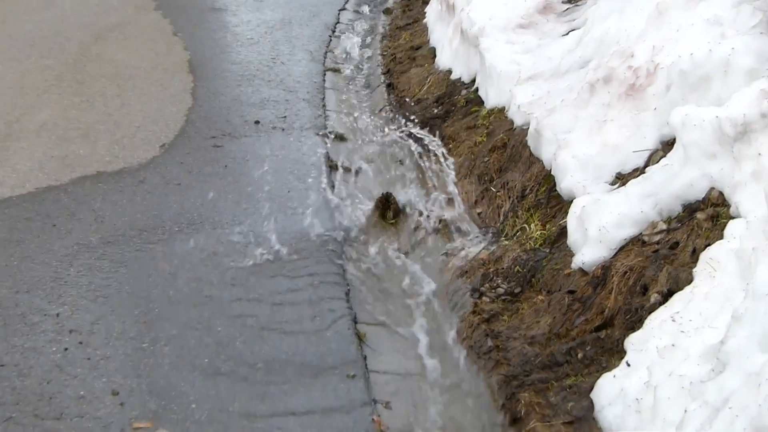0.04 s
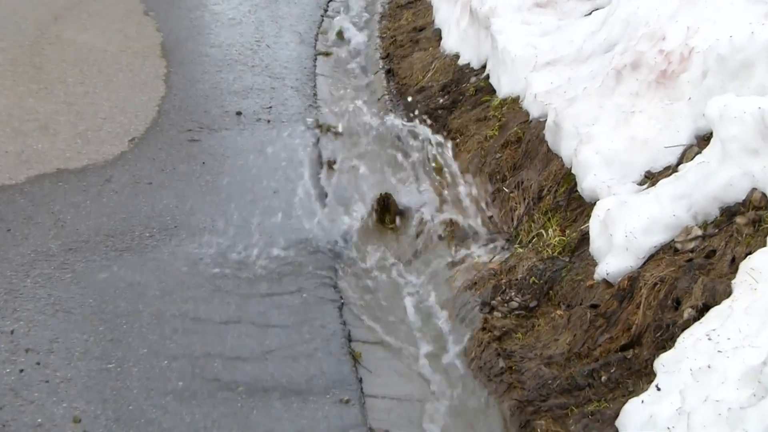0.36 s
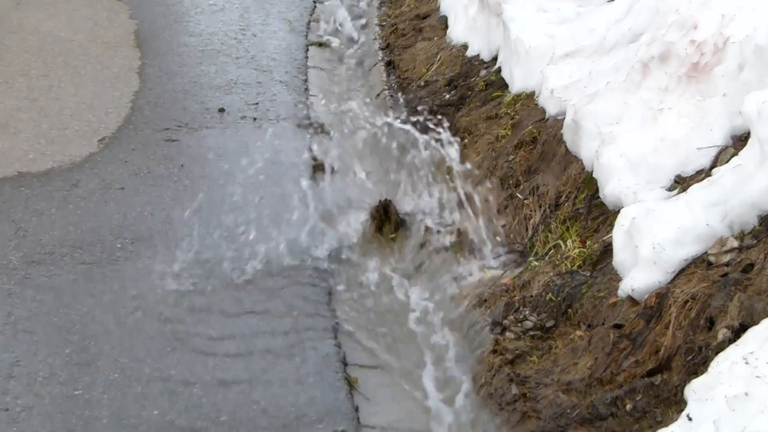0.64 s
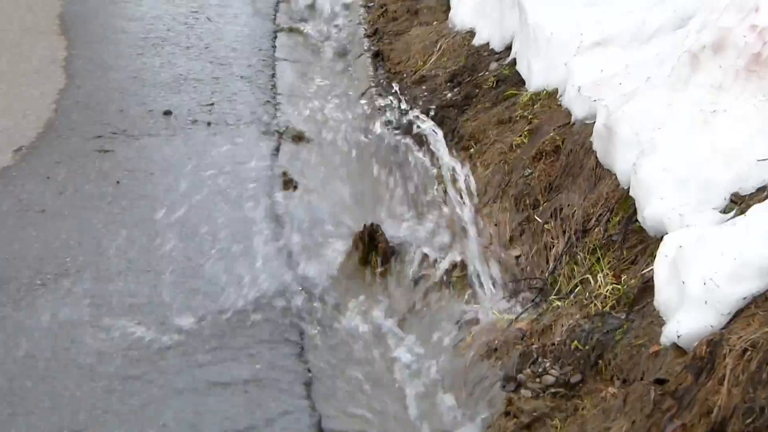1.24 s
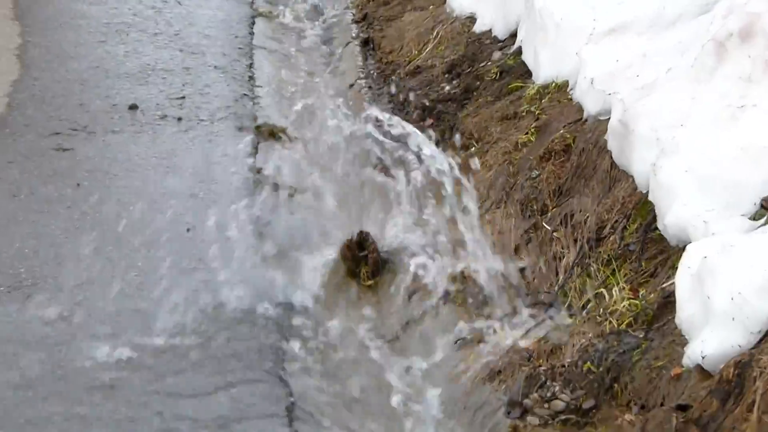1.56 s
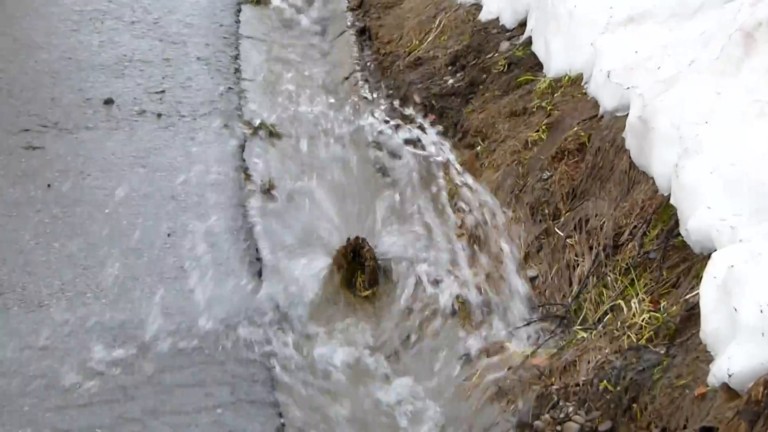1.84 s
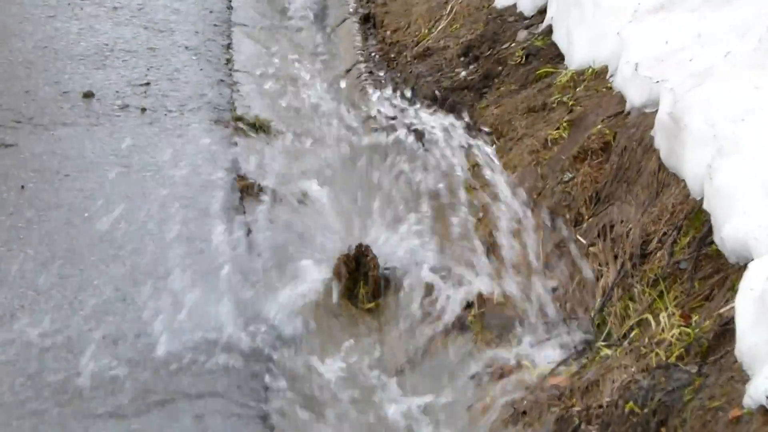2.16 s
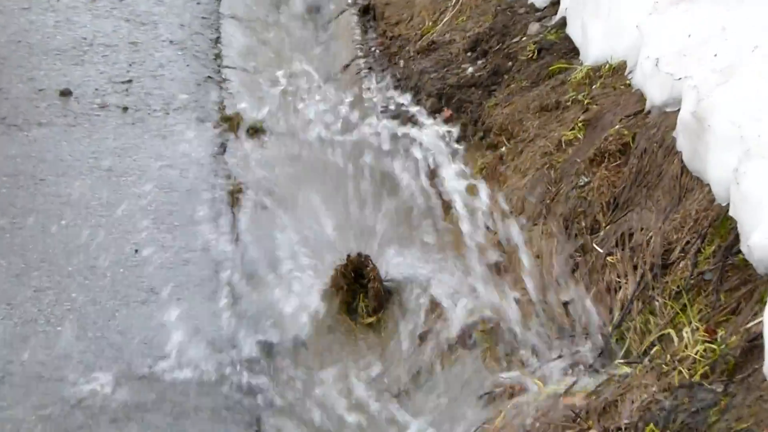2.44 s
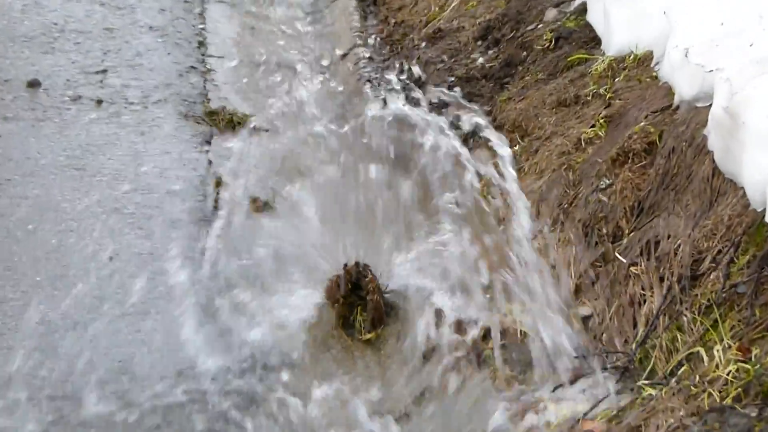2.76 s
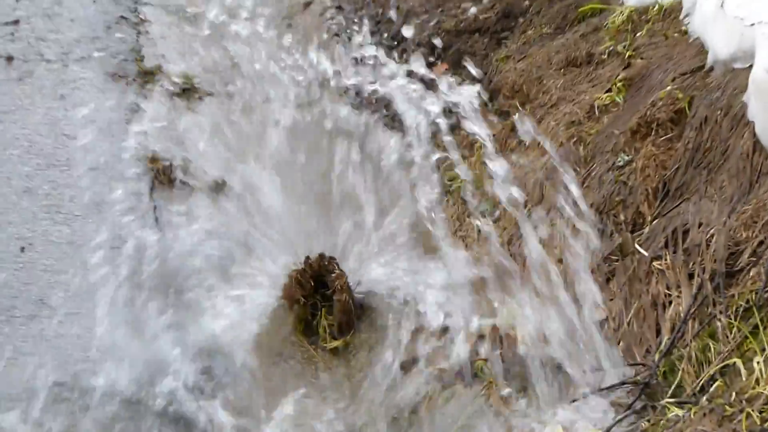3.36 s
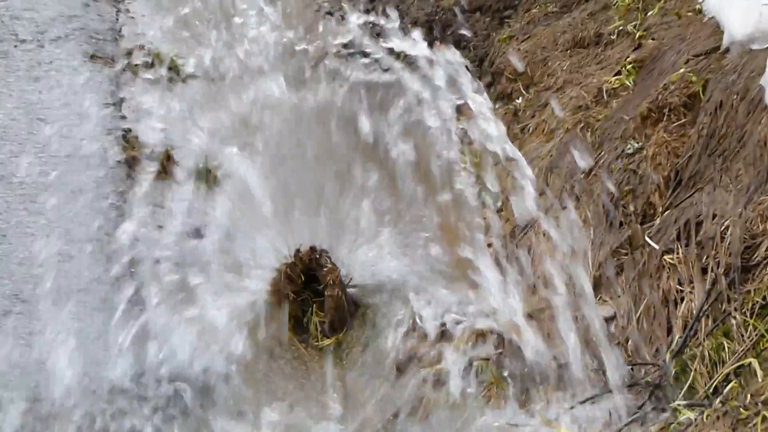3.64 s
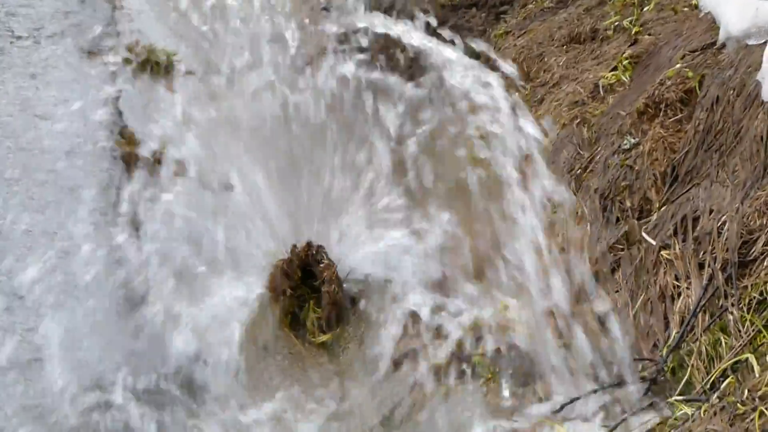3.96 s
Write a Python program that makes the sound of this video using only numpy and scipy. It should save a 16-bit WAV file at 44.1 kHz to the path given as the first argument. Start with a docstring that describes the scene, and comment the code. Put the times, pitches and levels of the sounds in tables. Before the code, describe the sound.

Fast meltwater rushes steadily along a roadside gutter, heard from close by outdoors. It bubbles and gurgles throughout as it fans over an obstacle, with spattering spray, scattered small splashes and ticking drops.

```python
"""Meltwater racing down a roadside gutter and fanning out over an obstacle, heard from close by
through two closely spaced microphone ports. Countless far bubbles blur into a steady rush; nearer
ones ring as small pings, gurgles and single glugs, under a spatter of falling spray. Small splashes
break out here and there, near drops tick on the water, and one lands right beside the right-hand port.
A faint rumble lies underneath."""
import sys
import numpy as np
from scipy import signal
from scipy.fft import rfft, irfft, next_fast_len
from scipy.io import wavfile
from scipy.ndimage import uniform_filter1d, map_coordinates

SR = 44100
rng = np.random.default_rng(int(sys.argv[2]) if len(sys.argv) > 2 else 0)


def file_out(sig):
    """Save sig as 16-bit WAV at sys.argv[1]."""
    # one column per channel
    cols = np.atleast_2d(sig).T
    # limit, then scale
    lim = np.clip(cols, -1, 1)
    pcm = np.round(lim * 32767).astype(np.int16)
    wavfile.write(sys.argv[1], SR, pcm)


N = 176400

# colour shared by the rush and the swarms of bubbles and spray: (frequency [Hz], level [dB])
WATER_COLOUR = [(25, -24.5), (70, -36.5), (130, -24), (185, -22), (225, -19.5), (280, -17.5), (330, -17),
                (400, -14.5), (530, -6.5), (720, -3), (940, -5.5), (1080, 1.7), (1240, 2.5), (1400, -1.9),
                (1720, 0), (1970, -9.5), (2250, -4), (2800, -4.5), (3400, -6), (4200, -6), (5300, -13),
                (6600, -10), (8500, -14), (10800, -17), (12500, -22.5), (14000, -27.5), (15700, -28.5)]
# the rush's own colour on top of that: (frequency [Hz], level [dB])
RUSH_COLOUR = [(30, 1.5), (150, -4.5), (400, -4.5), (1200, -5.5), (3000, -1), (7000, -2.5), (15000, -1.5)]
# how alike the rush is on left and right: (frequency [Hz], correlation [0-1])
RUSH_LIKENESS = [(40, 0.3), (150, .05), (260, 0.27), (380, 0.11), (560, 0.91), (1300, .91), (2600, 0.87),
                 (4000, 0.83), (5500, 0.63), (10500, 0.88), (13500, 0.22), (15500, 0.4)]
# swells of the bubbling mids: (time [s], level [dB])
CHURN_SWELLS = [(0.0, -1), (0.47, 1.4), (0.6, -5.5), (0.75, 0), (0.79, 2.8), (0.9, 2.2), (0.95, -1),
                (1.26, 3), (1.32, -1), (1.4, -1), (1.54, 1.5), (1.62, -2.1), (1.87, 1.5), (1.96, -3),
                (2.07, 2.5), (2.22, -5), (2.35, 1.1), (2.56, -1), (2.75, 2), (2.86, -5), (2.92, 3),
                (3.13, -2), (3.25, 2), (3.33, -1.2), (3.6, -0.7), (3.85, 3), (3.99, -9)]
# swells of the splashing treble: (time [s], level [dB])
SPRAY_SWELLS = [(0.0, -0.7), (0.18, 0.5), (0.49, 0.35), (0.96, 1.3), (1.03, -0.1), (1.48, 0.5), (1.51, -1),
                (1.59, 1), (2.0, 0), (2.32, 0.4), (2.43, 0), (2.66, 1), (2.87, 0.1), (3.42, -0.2),
                (3.77, 0.4), (3.84, 0), (3.92, 3.5), (3.99, 2)]
# swells of the low gurgle: (time [s], level [dB])
GURGLE_SWELLS = [(0, 4), (.08, 0), (.3, -3), (.78, -7), (.89, 3.5), (1.05, -2), (1.41, 2.5), (1.66, -2),
                 (1.92, -1), (2.02, 6), (2.2, 0.5), (2.87, -5), (3.02, 4), (3.33, -3), (3.54, 3.5),
                 (3.9, -1.5), (4, 1)]
# big single bubbles: (time [s], relative level [dB], starting pitch [Hz])
BIG_BUBBLES = [(.057, -23.5, 745), (.287, -19.5, 700), (.79, -15.5, 1060), (.842, -19, 700),
               (.877, -20, 846), (.88, -19, 1150), (1.052, -25.5, 700), (1.308, -20, 700),
               (1.325, -25, 774), (1.329, -13, 1510), (1.388, -24.5, 550), (1.41, -34, 472),
               (1.541, -14, 1080), (1.799, -14, 1205), (1.881, -14.5, 1190), (1.963, -26, 710),
               (2.735, -18, 1090), (2.921, -15, 1096), (3.053, -14, 1430), (3.213, -22.5, 544),
               (3.252, -18, 866), (3.455, -16, 1220), (3.469, -17, 1230), (3.713, -25, 700),
               (3.785, -17, 833), (3.843, -17.5, 1220)]
# lumps of water breaking up: (time [s], relative peak [dB], centre pitch [Hz])
SMALL_SPLASHES = [(.1, -24, 3600), (.14, -24, 3400), (.148, -21.5, 2700), (.181, -21, 3650),
                  (.244, -25.5, 3500), (.277, -20, 3350), (.307, -25, 3100), (.372, -27, 2900),
                  (.562, -24, 2700), (.66, -24, 3700), (.69, -25, 3920), (0.907, -26, 3100),
                  (1.461, -22, 2700), (1.598, -28, 2700), (1.682, -24, 3400), (1.758, -24, 4000),
                  (2.335, -24, 3600), (2.638, -21.5, 3200), (2.661, -23.5, 3620), (3.375, -27, 2900),
                  (3.543, -21.5, 3000), (3.645, -25.5, 3000), (3.903, -23, 3600), (3.969, -24, 4200)]
# drops near the microphone: (time [s], level [dB], starting pitch [Hz], ring length [cycles])
NEAR_DROPS = [(.14, -15, 6840, 8.4), (.224, -18.5, 7500, 11), (.579, -20, 7000, 12), (.652, -27, 4350, 94),
              (0.85, -17, 6500, 16), (1.296, -10.5, 7240, 10.4), (1.395, -19, 8500, 10),
              (1.766, -20, 6500, 11), (2.0297, -14.5, 3780, 10.3), (2.325, -27, 4300, 70),
              (2.757, -14, 8000, 7.8), (3.102, -23, 2500, 28), (3.527, -23, 3000, 18),
              (3.538, -18.5, 5000, 8.9), (3.921, -15, 3660, 13)]
# modes of the microphone casing: (frequency [Hz], relative level [dB], time to fall 60 dB [s])
CASING_MODES = [(1200, -8, .011), (1620, -8, .010), (2500, -4, .005), (3150, -6.5, .005), (3950, -4, .005),
                (4950, -9, .004), (7000, -5.5, .004), (9000, -6, .004), (10700, -7, .004),
                (12000, -7, .004)]
# colour of the snap beside the port: (frequency [Hz], level [dB])
CRACK_COLOUR = [(500, -6), (1200, 0), (4500, -1), (5700, -10), (7000, -3), (11500, -4), (13500, -12)]
# swells of the background rumble: (time [s], level [dB])
RUMBLE_SWELLS = [(0, -72), (.14, -73), (.3, -91), (1.8, -83), (2.35, -66.5), (2.9, -83), (3.41, -77),
                 (3.45, -59), (3.5, -76), (4, -77)]
# how the two ports differ: (frequency [Hz], left minus right [dB], left lead [rad])
PORT_SHADING = [(100, -1, 0), (260, 2, 0), (380, .8, -.6), (550, 1.8, .1), (780, 1.2, 0), (930, -.7, .2),
                (1150, 2.7, .35), (1400, .7, .3), (1700, 2, .3), (1980, .1, .3), (2300, 1, .2),
                (2800, -1.5, .4), (3400, .5, .6), (4500, -3.2, 1.2), (5300, 1.8, 2), (5800, 5, 1.4),
                (7500, 1.7, 1.3), (8700, -3.6, 1.8), (10300, -.7, 2.8), (12200, 3.2, 3), (15700, .6, 3.2)]

RUSH_DB, BUBBLE_DB, GURGLE_DB, PLINK_DB, SPRAY_DB = -38, -42.5, -56.5, -46, -44.5  # before the swells
HOLLOW_HZ, HOLLOW_WIDTH_HZ, HOLLOW_SWAY = 1200, 280, 0.21  # the bubbles' weight sways about this centre
TOP_HZ = 15900


def stream():
    """Churning drives the bubbles and sways their size; spray lands in spurts and leaves rising plinks."""
    churn_db, gurgle_db = curve(CHURN_SWELLS), curve(GURGLE_SWELLS)
    spurt_db = curve(SPRAY_SWELLS) + wobble(per_s=60) + 0.23 * wobble(per_s=25.38)
    bed = rush(patchy_db=1.5)
    bubbles = swarm(per_s=1300, low_hz=700, high_hz=2022, cycles=18.5, rise=0.078,
                    onset_cycles=0.71, spread_db=2.5, width_s=9e-5)
    tilted = filtered(bubbles, lambda hz: np.tanh((hz - HOLLOW_HZ) / HOLLOW_WIDTH_HZ))
    bubbles = unit(bubbles + HOLLOW_SWAY * wobble(per_s=12) * tilted)
    gurgles = swarm(per_s=220, low_hz=219, high_hz=568, cycles=26.7, rise=0.17,
                    onset_cycles=0.76, spread_db=2.5, width_s=5.9e-4)
    plinks = swarm(per_s=520, low_hz=1811, high_hz=8000, cycles=63, rise=0.097,
                   onset_cycles=0.92, spread_db=2.0, width_s=3.5e-5)
    spray = swarm(per_s=1800, low_hz=2590, high_hz=13800, cycles=10, rise=0.044,
                  onset_cycles=0.72, spread_db=2.5, width_s=1.8e-5)
    return (bed * amp(RUSH_DB + 0.41 * spurt_db)
            + bubbles * amp(BUBBLE_DB + churn_db + 0.73 * spurt_db)
            + gurgles * amp(GURGLE_DB + gurgle_db)
            + plinks * amp(PLINK_DB + spurt_db)
            + spray * amp(SPRAY_DB + 1.5 * spurt_db))


def rush(patchy_db):
    """The blur of countless bubbles far from the microphone: noise with drifting patches of gain."""
    def mid_side_gains(hz):
        angle = np.arccos(np.clip(along(RUSH_LIKENESS, hz), 0, 1)) / 2
        colour = amp(along(WATER_COLOUR, hz) + along(RUSH_COLOUR, hz))
        return colour * [np.cos(angle), np.sin(angle)]

    spectra = signal.stft(rng.standard_normal((2, N)), nperseg=256)[2]
    patches = uniform_filter1d(rng.standard_normal(spectra.shape[1:]), size=6, axis=0)  # across pitch
    patches = uniform_filter1d(patches, size=9, axis=1)  # across time
    noise = signal.istft(spectra * amp(patchy_db * unit(patches)), nperseg=256)[1][:, :N]
    mid, side = filtered(noise, mid_side_gains)
    return unit(np.array([mid + side, mid - side]))


def swarm(per_s, low_hz, high_hz, cycles, rise, onset_cycles, spread_db, width_s):
    """Bubbles or droplets of all sizes ping at random, reaching the ports up to width_s apart; rms 1."""
    when, pitch, size, bearing = rng.random((int(per_s * N / SR), 4)).T
    start_s = when * N / SR
    hz = low_hz * (high_hz / low_hz) ** pitch
    strength = np.minimum(-np.log(1 - size), np.log(100))  # many weak, a few strong
    db = spread_db * strength + 20 * np.log10(hz / low_hz)
    lag_s = width_s * (2 * bearing - 1)
    octave = np.floor(np.log2(hz / low_hz))
    groups = [octave == k for k in np.unique(octave)]  # pings of similar length go together
    sound = sum(pings(start_s[g], db[g], hz[g], cycles, rise, onset_cycles, lag_s[g]) for g in groups)
    return unit(coloured(sound, WATER_COLOUR))


def pings(start_s, db, hz, cycles, rise, onset_cycles, lag_s=0):
    """Bubbles ring as damped sines: over `cycles` they fall 60 dB and go sharp by the fraction `rise`."""
    start_s, db, hz = np.atleast_1d(start_s, db, hz)
    t = np.arange(int(cycles / hz.min() * SR) + 1) / SR
    turns = hz[:, None] * t
    envelope = amp(db[:, None] - 60 * turns / cycles) * (1 - np.exp(-turns / onset_cycles))
    phase = 2 * np.pi * turns * (1 + rise * np.minimum(turns / cycles, 2) / 2)
    samples = (start_s[:, None] * SR).astype(int) + np.arange(len(t))
    lead = (np.pi * hz * lag_s)[:, None]  # half the lag goes to each port
    rings = [envelope * np.sin(phase + side * lead) for side in (1, -1)]
    return np.array([np.bincount(samples.ravel(), ring.ravel(), N)[:N] for ring in rings])


def glugs(gain_db=-4):
    """Big bubbles ring and rise in pitch as they near the surface."""
    start_s, db, hz = np.transpose(BIG_BUBBLES)
    return pings(start_s, db + gain_db, hz, cycles=26.2, rise=0.1, onset_cycles=3.6)


def splashes(droplets=8, scatter_s=0.006, scatter_octaves=0.5, gain_db=-4):
    """A lump of water breaks into a quick cluster of droplets scattered around one pitch."""
    sound = np.zeros((2, N))
    for start_s, db, centre_hz in SMALL_SPLASHES:
        delay, pitch = rng.random((droplets, 2)).T
        hz = centre_hz * 2 ** (scatter_octaves * (2 * pitch - 1))
        landing_s = start_s + scatter_s * delay
        cluster = pings(landing_s, np.zeros(droplets), hz, cycles=9, rise=0.05, onset_cycles=0.83)
        sound += amp(db + gain_db) * cluster / np.abs(cluster).max()
    return sound


def drops():
    """Drops slap the water near the microphone with a short tick; some trap a bubble that rings on."""
    return sum(pings(start_s, db, hz, cycles, rise=0.081, onset_cycles=0.25)
               for start_s, db, hz, cycles in NEAR_DROPS)


def casing_tap(start_s=3.4345, left_gain_db=-20, right_gain_db=-9.3, attack_s=0.00015):
    """A dry snap right beside the right-hand port, likely a drop bursting on the casing."""
    t = np.maximum(np.arange(N) / SR - start_s, 0)
    ring = sum((-1) ** k * amp(db - 60 * t / t60) * np.sin(2 * np.pi * hz * t)
               for k, (hz, db, t60) in enumerate(CASING_MODES))
    hiss = filtered(rng.standard_normal((2, N)), lambda hz: amp(along(CRACK_COLOUR, hz)))
    crack = amp(-4 - 60 * t / 0.012) * hiss  # falls 60 dB in 12 ms
    attack = 1 - np.exp(-t / attack_s)
    band = signal.butter(4, [650, 12600], "bandpass", fs=SR, output="sos")
    snap = signal.sosfilt(band, (ring + crack) * attack)
    return amp([[left_gain_db], [right_gain_db]]) * snap


def rumble(corner_hz=40):
    """A faint low background, alike at both ports, that swells at the start, midway and at the tap."""
    low_noise = filtered(rng.standard_normal(N), lambda hz: 1 / (1 + (hz / corner_hz) ** 2))
    return amp(curve(RUMBLE_SWELLS)) * unit(low_noise)


def ports(x):
    """The microphone casing shades and delays the sound differently at each port."""
    table, sides = np.array(PORT_SHADING), np.array([[0.5], [-0.5]])

    def response(hz):
        gain = amp(sides * along(table[:, [0, 1]], hz))
        phase = sides * along(table[:, [0, 2]], hz)
        return gain / np.sqrt(np.mean(gain ** 2, axis=0)) * np.exp(1j * phase)

    return filtered(x, response)


def amp(db):
    """Decibels to gain."""
    return 10 ** (np.asarray(db) / 20)


def unit(x):
    """x scaled to rms 1."""
    return x / np.sqrt(np.mean(x ** 2) + 1e-20)


def along(points, hz):
    """(frequency [Hz], value) points read at hz on a log axis."""
    point_hz, values = np.transpose(points)
    return np.interp(np.log(hz + 1), np.log(point_hz + 1), values)


def curve(points):
    """(time [s], level [dB]) points joined into one level per sample."""
    times, levels = np.transpose(points)
    return np.interp(np.arange(N) / SR, times, levels)


def wobble(per_s):
    """A smooth random curve with per_s knots a second."""
    knots = rng.standard_normal(int(N * per_s / SR) + 4)
    return map_coordinates(knots, [np.arange(N) * per_s / SR])


def filtered(x, response):
    """x with its spectrum multiplied by response(hz)."""
    size = next_fast_len(N + SR // 2)
    hz = np.fft.rfftfreq(size, 1 / SR)
    return irfft(rfft(x, size) * response(hz), size)[..., :N]


def coloured(x, points, size=4096):
    """Stereo x through a causal filter shaped by (frequency [Hz], level [dB]) points."""
    gain = amp(along(points, np.fft.rfftfreq(size, 1 / SR)))
    cepstrum = irfft(np.log(gain))
    cepstrum[1:size // 2] *= 2  # fold to minimum phase, so nothing rings ahead of a ping
    cepstrum[size // 2 + 1:] = 0
    impulse = irfft(np.exp(rfft(cepstrum)))
    return signal.fftconvolve(x, impulse[None], axes=1)[:, :N]


def scene():
    """The gutter water at the two ports, the stray drop beside the right one and the rumble behind."""
    water = stream() + glugs() + splashes() + drops()
    return ports(water) + casing_tap() + rumble()


def record(dry):
    """The recorder keeps nothing above its band limit."""
    return filtered(dry, lambda hz: hz < TOP_HZ)


dry = scene()
out = record(dry)
file_out(out)
```